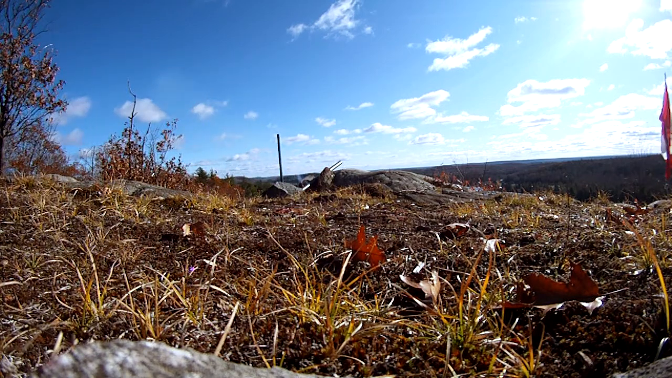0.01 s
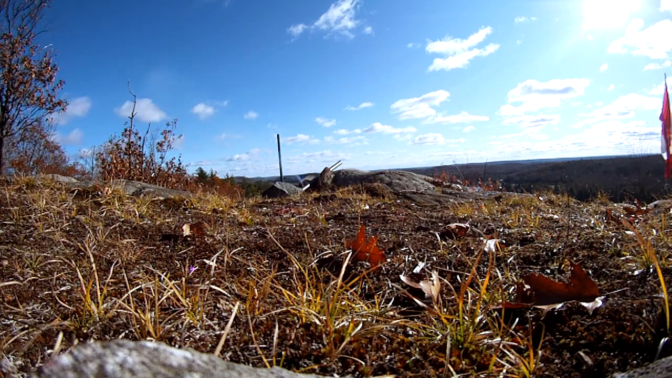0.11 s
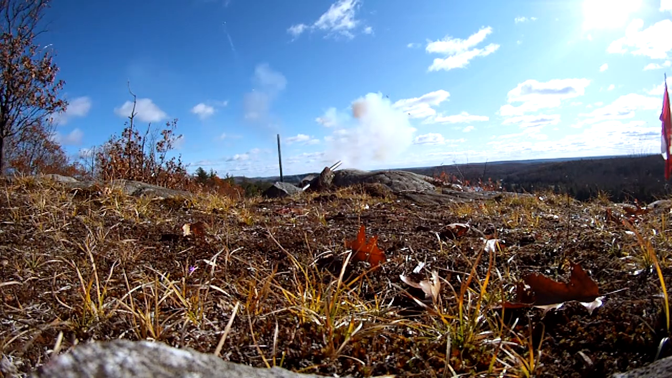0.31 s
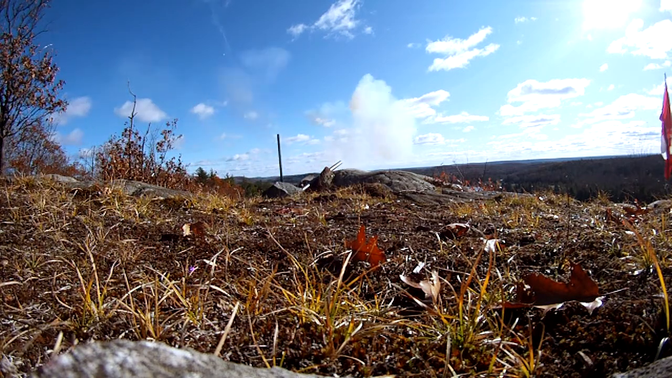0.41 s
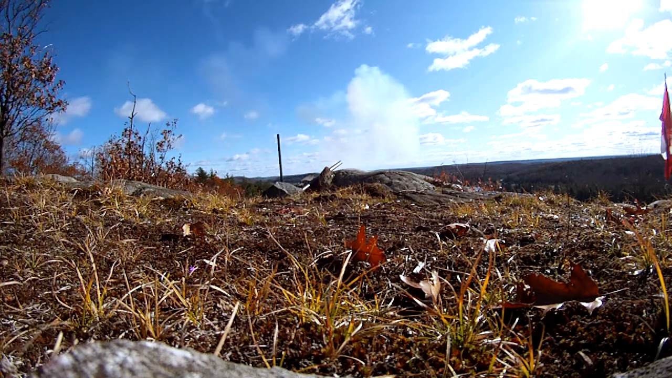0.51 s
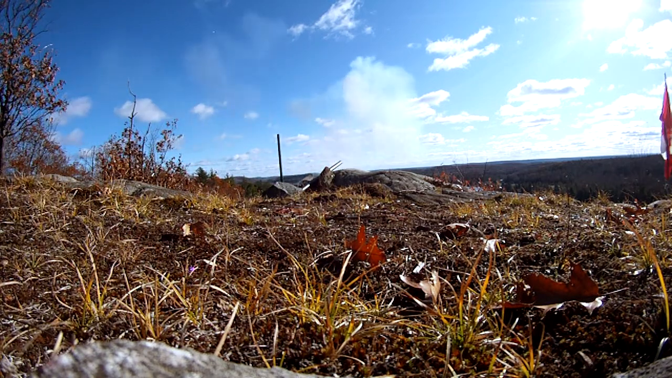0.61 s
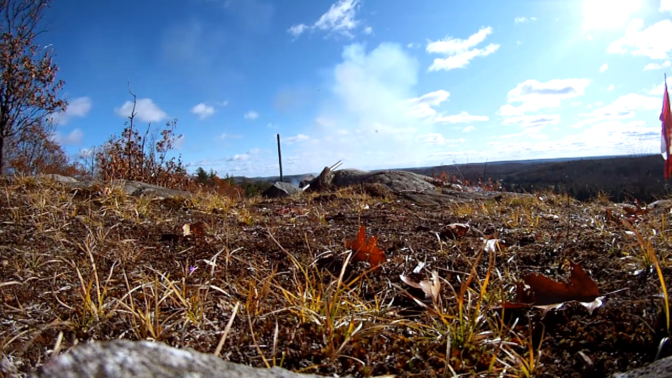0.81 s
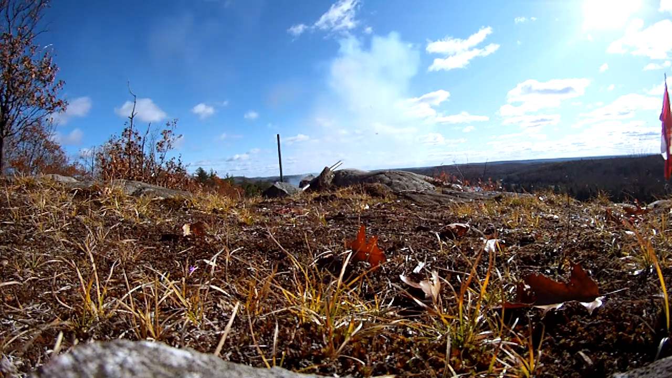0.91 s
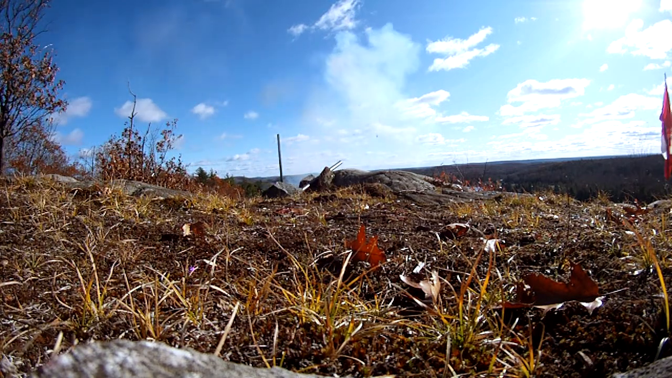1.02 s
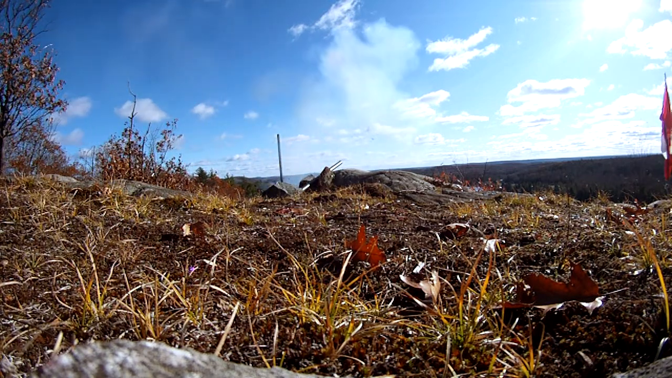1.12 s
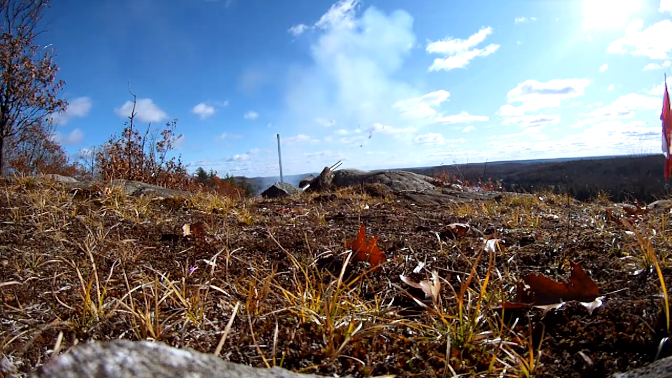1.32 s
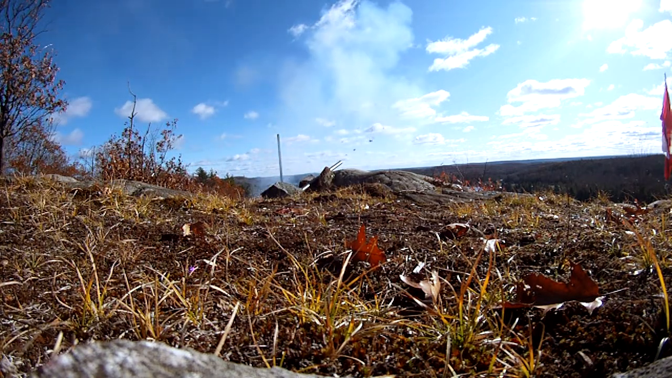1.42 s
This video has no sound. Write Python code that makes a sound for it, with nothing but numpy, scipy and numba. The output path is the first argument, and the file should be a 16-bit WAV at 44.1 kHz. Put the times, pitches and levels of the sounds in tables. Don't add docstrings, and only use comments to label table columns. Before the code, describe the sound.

Quiet air and a tiny ground rattle, then one huge cracking cannon boom, an immediate hard echo, and low uneven rumbling from distant trees and hills, with faint hissing, heard by an overloaded small camera microphone.

```python
import sys
import numpy as np
from scipy import signal
from scipy.fft import rfft, irfft
from scipy.io import wavfile
from scipy.ndimage import uniform_filter1d
from numba import njit

SR = 44100
rng = np.random.default_rng(int(sys.argv[2]) if len(sys.argv) > 2 else 0)


def inscribe(sig):
    pcm = np.round(np.clip(np.atleast_2d(sig).T, -1, 1) * 32767)
    wavfile.write(sys.argv[1], SR, pcm.astype(np.int16))


def elevation(decibels):
    levels = np.asarray(decibels, float)
    return 10 ** (levels / 20)


N = 66150

# (start [s], level [dB], rise [s], hold [s])
BLASTS = [
    (.2225, 5, 0.0083, .027),
    (.279, -1, 0.00033, 0.045),
]


def seconds():
    return np.arange(N) / SR


def noise():
    return rng.standard_normal(N)


def line(table):
    points = np.array(table, float)
    return np.interp(seconds(), points[:, 0], points[:, 1])


def unit(x):
    return x / np.sqrt(np.mean(x ** 2))


def decay(t, t60):
    return elevation(-60 * np.clip(t, 0, 9) / t60)


def colour(x, table):
    points = np.array(table, float)
    log_hz = np.log(np.arange(N // 2 + 1) * SR / N + 1)
    table_log_hz = np.log(points[:, 0])
    db = np.interp(log_hz, table_log_hz, points[:, 1])
    db = db - 20 * np.clip(table_log_hz[0] - log_hz, 0, 9)
    db = db - 3000 * np.clip(log_hz - table_log_hz[-1], 0, 9)
    return unit(irfft(rfft(x) * elevation(db), N))


def walk(rate):
    size = int(SR / rate)
    steps = np.repeat(rng.standard_normal(N // size + 1), size)
    smooth = uniform_filter1d(uniform_filter1d(steps, size), size)
    return unit(smooth[:N])


def grit(per_s, scatter_db):
    chance, side, size = rng.random((N, 3)).T
    return (chance < per_s / SR) * np.sign(side - .5) * elevation(-scatter_db * np.log(size + 1e-9))


def patchy(table):
    spectrum = rfft(colour(noise(), table))
    band = (np.arange(len(spectrum)) * SR / N // 350).astype(int)
    out = 0
    for k in range(42):
        out = out + irfft(spectrum * (band == k), N) * elevation(2.0 * walk(15.87))
    return unit(out)


@njit
def svf(x, hz, share):
    y, band, low = np.empty(len(x)), 0., 0.
    for i in range(len(x)):
        g = np.tan(np.pi * hz[i] / SR)
        v = (band + g * (x[i] - low)) / (1 + g * (g + share))
        band, low, y[i] = 2 * v - band, low + 2 * g * v, share * v
    return y


def muzzle():
    # (frequency [Hz], level per Hz [dB])
    crack_colour = [(300, 6), (900, -14), (2500, -4.5), (6000, -3), (11000, -11.5), (16000, -13)]
    boom_hz, boom_end_hz, boom_width = 945, 190, 1.4
    start, db, rise, hold = BLASTS[0]
    t = seconds() - start
    hz = boom_hz * (boom_end_hz / boom_hz) ** np.clip(t / (rise + hold), 0, 1)
    gas = noise() * np.sqrt(boom_end_hz / hz)
    boom = unit(svf(svf(gas, hz, boom_width), hz, boom_width))
    boom = boom * np.clip(t / rise, 0, 1) ** 1.66
    crack = elevation(-10.5) * colour(noise(), crack_colour) * decay(t - rise - .012, t60=0.13)
    crack = crack * np.clip(t / 0.0067, 0, 1)
    return elevation(db) * (boom + crack) * decay(t - rise - hold, t60=.004)


def swing():
    start_hz, sag_hz_per_s = 232, 7200
    since = seconds() - .2601
    t = np.clip(since, 0, .015)
    cycles = (start_hz - sag_hz_per_s * t / 2) * t
    return -elevation(20) * np.sin(2 * np.pi * cycles) * decay(since, t60=.0175)


def slap():
    # (centre [Hz], time to fall 60 dB [s], level [dB])
    fade = [(175.7, 0.52, -7), (400, 0.88, -13), (789, 0.76, -16.5), (1520, 0.77, -20), (2896, 0.58, -17),
            (6050, .45, -16.5), (10900, 0.38, -23)]
    start, db, rise, hold = BLASTS[1]
    t = seconds() - start
    body = 0
    for hz, t60, band_db in fade:
        x = noise() * 0.48 + unit(grit(4 * hz, scatter_db=2.0))
        top = (min(hz * 3, 15100), -24 if hz < 9000 else -6)
        band = colour(x, [(hz / 3, -30), (hz / 1.824, -3), (hz, 0), (hz * 1.15, -2), top])
        rough_db = 1.7 * min(1, 900 / hz) * walk(50.5)
        bass_db = 6 * np.clip(1 - t / .03, 0, 1) * (hz < 500)
        body = body + elevation(band_db + rough_db + bass_db) * band * decay(t - hold, t60)
    step_db = 6.5 * np.clip(1 - (t - hold) / 0.016, 0, 1)
    body = elevation(db + step_db) * np.clip(t / rise, 0, 1) * body

    sizzle = colour(noise(), [(4000, 11), (7000, -16), (16000, -1)])
    herald = elevation(-18) * np.clip(1 + t / .005, 0, 1) * (t < 0)
    tail = elevation(-24) * decay(t - hold, t60=.11)
    crack = elevation(-6) * decay(t, t60=.04)
    return body + sizzle * (herald + (t > 0) * (tail + crack))


def waves():
    # (time [s], peak level [dB], pitch [Hz], length [cycles])
    swings = [(0.039, -38, 188, 1.8), (0.2152, -16.5, 295, 1.16), (0.2218, -5, 454, 0.71),
              (0.354, 0.5, 190, 1.12), (0.43, -8, 307, 1.9), (0.448, -13, 290, 0.85), (.488, -9, 378, 0.82),
              (.542, -15.5, 241, 2.3), (0.619, -20.5, 300, 0.51), (.638, -28.5, 289, 3.1),
              (.728, -24.5, 510, 1.5), (0.746, -17, 400, 0.91), (.949, -20, 229, 1.45),
              (1.104, -25.5, 300, 1.1), (1.18, -24, 170, 4.4), (1.343, -24.5, 225, 2),
              (1.479, -27.5, 280, 1.5)]
    signs = [-1, -1, 1, 1, -1, 1, -1, 1, -1, 1, 1, -1, -1, -1, -1, 1, 1]
    out = 0
    for (at, db, hz, cycles), sign in zip(swings, signs):
        t = seconds() - at
        swell = np.exp(-(t * hz * 2 / cycles) ** 2)
        out = out + sign * elevation(db) * np.cos(2 * np.pi * hz * t) * swell
    return out


def roll():
    # (time [s], level [dB])
    roll_level = [(.33, -28), (.5, -32.5), (.62, -35), (.72, -34), (.81, -38), (.87, -31.5), (1.0, -30.5),
                  (1.35, -36.5), (1.5, -39.5)]
    # (frequency [Hz], level per Hz [dB])
    echo_colour = [(35, -55), (60, -26.5), (184, 0.5), (300, -6.5), (404, -6), (629, -11.5), (702, -20),
                   (876, -17.5), (2600, -41), (3380, -59), (5720, -120)]
    copies = unit(grit(per_s=900, scatter_db=2.5)) + 0.96 * noise()
    echoes = colour(copies, echo_colour)
    fade_in = np.clip((seconds() - roll_level[0][0]) * 20, 0, 1)
    return echoes * elevation(line(roll_level) + 0.66 * walk(25.9)) * fade_in


def shake():
    # (frequency [Hz], level per Hz [dB])
    shake_colour = [(100, -7), (300, -12), (900, -15), (2000, -12.5), (3000, -37)]
    start, end, db = .165, .213, -50
    t = seconds()
    on = np.clip((t - start) * 100, 0, 1) * decay(t - end, t60=0.03)
    level = line([(start, db), (end - .012, db + 4), (end, -36)])
    return colour(noise(), shake_colour) * elevation(level) * on


def air():
    # (frequency [Hz], level per Hz [dB])
    air_colour = [(110, -2), (220, 2.5), (600, -9), (2000, -8.5), (3000, -14.5), (7000, -13), (11000, -17),
                  (14350, -24)]
    # (frequency [Hz], level per Hz [dB])
    hiss_colour = [(2000, 1), (3200, -14), (4600, -3.5), (5800, -7), (7370, -1.5), (9500, -6), (12000, -13),
                   (14350, -16)]
    # (time [s], level [dB])
    hiss_level = [(.3, -46), (.6, -41), (.72, -46.5), (.81, -45), (.865, -51), (.91, -46), (1.22, -47.5),
                  (1.5, -49.5)]
    # (from [s], to [s])
    shut_times = [
        (.2155, .2225),
        (.2640, .2750),
    ]
    t = seconds()
    floor = patchy(air_colour) * elevation(-47.5)
    smoke = patchy(hiss_colour) * elevation(line(hiss_level) + .5 * walk(20.3)) * (t > BLASTS[1][0])
    shut = sum((t > a) & (t < b) for a, b in shut_times)
    return (floor + smoke) * elevation(-35 * uniform_filter1d(1. * shut, size=60))


def scene():
    return (muzzle() + swing() + slap() + waves() + roll() + shake() + air())[None]


def top_cut(x):
    return signal.sosfilt(signal.butter(12, 16430, fs=SR, output="sos"), x)


def record(dry):
    clip, knee = 1.03, 13
    x = signal.sosfilt(signal.butter(1, 92, "high", fs=SR, output="sos"), dry)
    flat = clip * x / (clip ** knee + np.abs(x) ** knee) ** (1 / knee)
    flat = signal.sosfiltfilt(signal.ellip(6, .1, 30, 15900, fs=SR, output="sos"), flat)
    return top_cut(flat)


dry = scene()
out = record(dry)
inscribe(out)
```